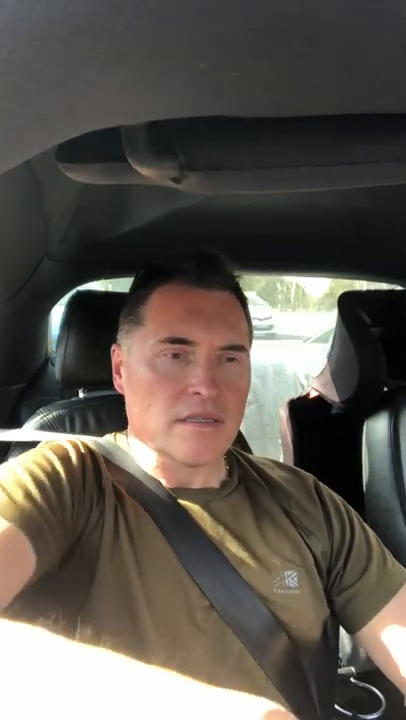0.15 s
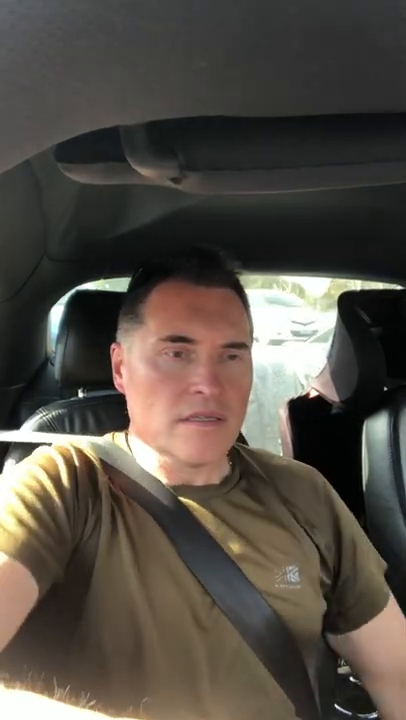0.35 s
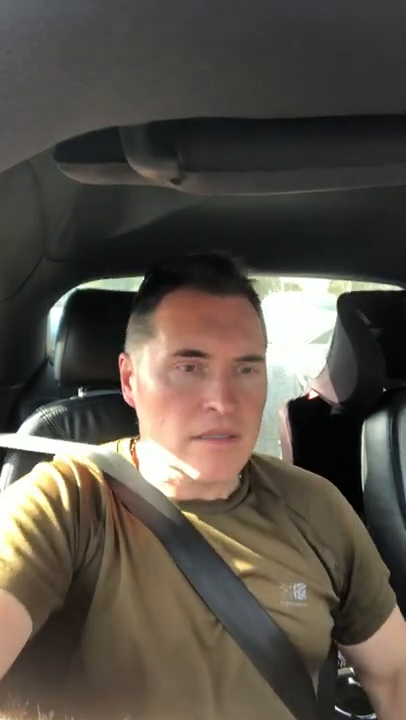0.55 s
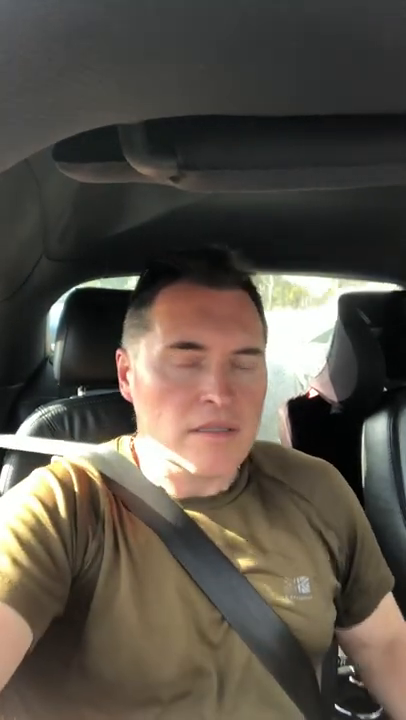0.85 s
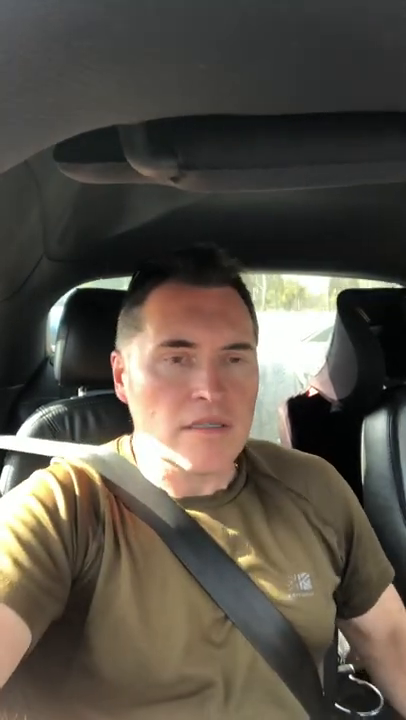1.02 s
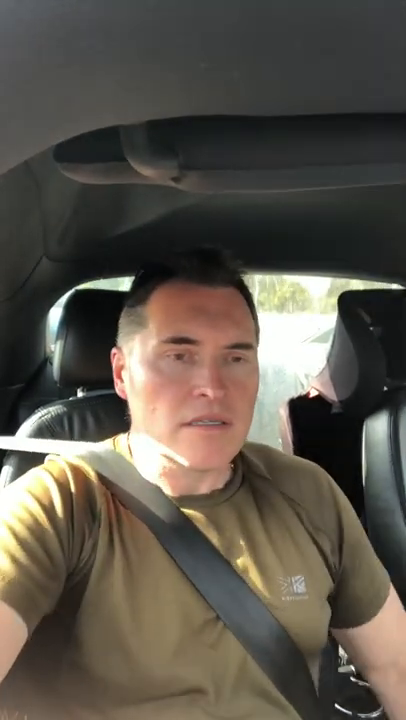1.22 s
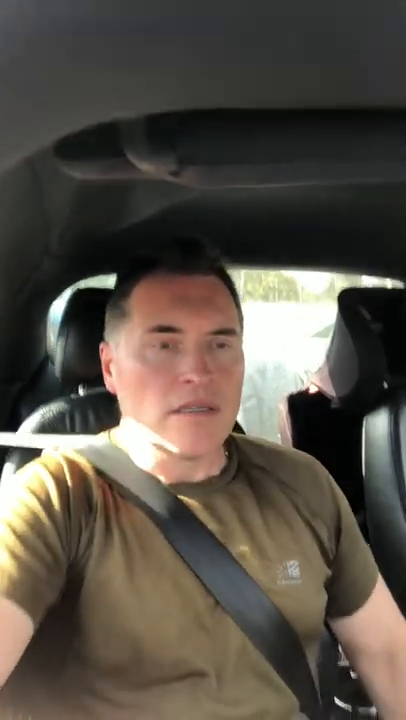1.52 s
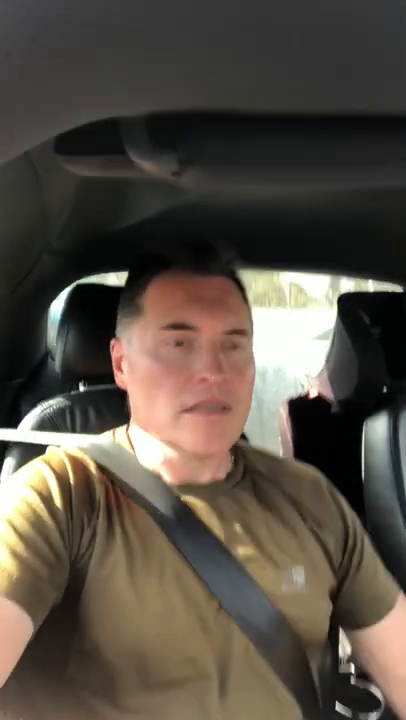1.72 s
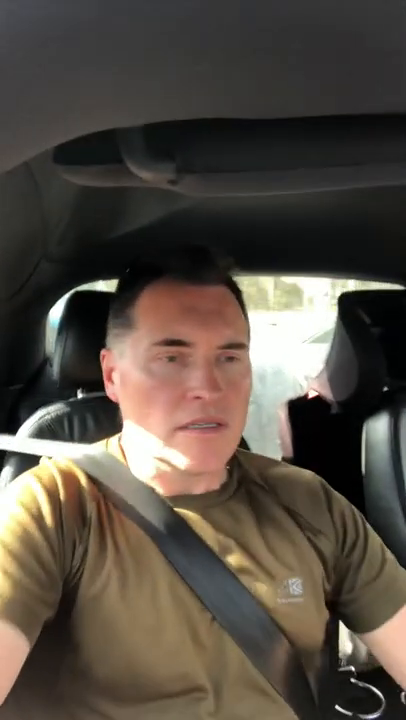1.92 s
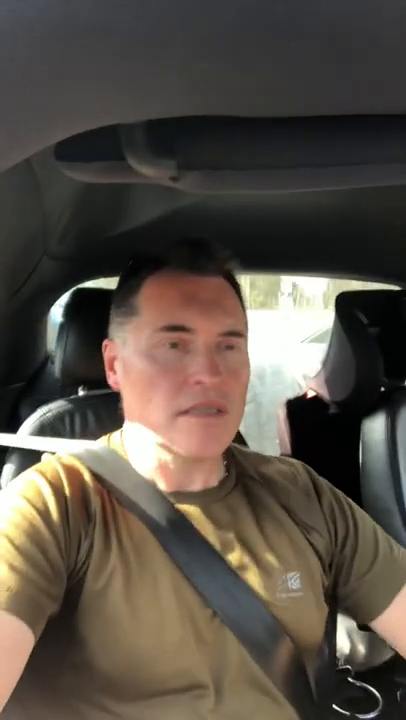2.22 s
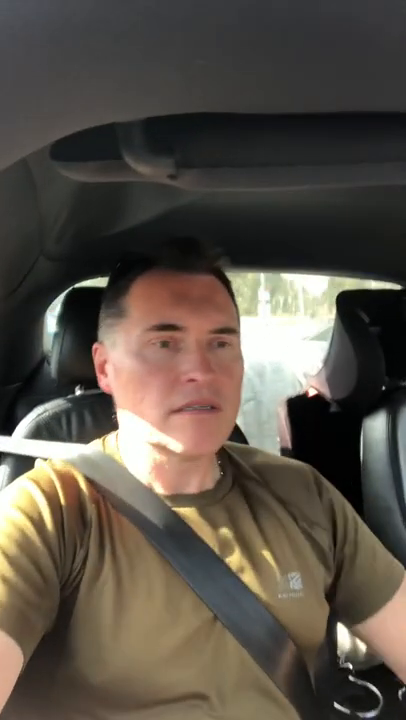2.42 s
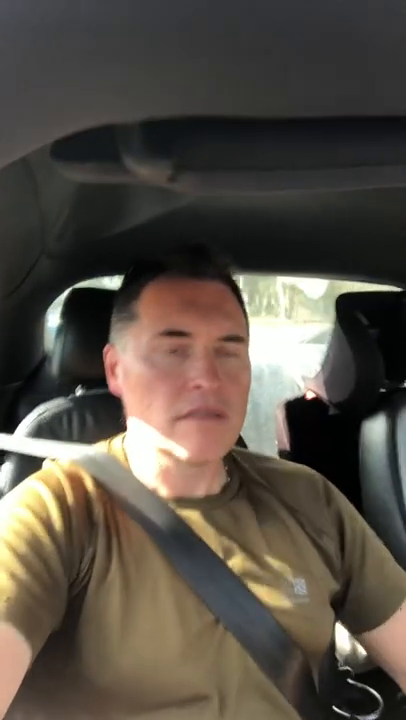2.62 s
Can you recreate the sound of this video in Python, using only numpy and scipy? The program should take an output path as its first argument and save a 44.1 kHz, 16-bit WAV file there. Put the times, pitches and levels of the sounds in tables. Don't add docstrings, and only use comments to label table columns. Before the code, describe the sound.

Inside a moving car, muffled engine drone dips low, then rises and settles; a hard hollow plastic knock comes early in the pull, later soft road thuds and a faint thin squeak, captured by a phone.

```python
import sys
import numpy as np
from scipy import signal
from scipy.io import wavfile
from scipy.ndimage import uniform_filter1d

SR = 44100
rng = np.random.default_rng(int(sys.argv[2]) if len(sys.argv) > 2 else 0)


def invert_db(x):
    u = np.asarray(x, float) / 20
    return 10 ** u


def unload_audio(sound):
    columns = np.transpose(np.atleast_2d(sound))
    steps = np.round(np.clip(columns, -1, 1) * 32767)
    wavfile.write(sys.argv[1], SR, steps.astype(np.int16))


N = 121275


def evened(x):
    return x / np.sqrt(np.mean(x ** 2) + 1e-20)


def peaked(x):
    return x / np.abs(x).max()


def drift(size):
    return evened(uniform_filter1d(uniform_filter1d(rng.standard_normal(N), size), size))


def read(points, hz):
    f, value = np.transpose(points)
    return np.interp(np.log(hz + 1), np.log(f + 1), value)


def causal(x, db_of, size):
    db = np.maximum(db_of(np.abs(np.fft.fftfreq(size, 1 / SR))), -100)
    log_gain = db * np.log(10) / 20
    taps = np.fft.ifft(np.exp(log_gain - 1j * signal.hilbert(log_gain).imag)).real[:size // 2]
    return signal.oaconvolve(x, taps)[:len(x)]


def resonate(x, hz, width):
    turn = np.exp(2j * np.pi * hz * np.arange(len(x)) / SR)
    r = np.exp(-np.pi * width / SR)
    return 2 * (turn * signal.lfilter([1 - r], [1, -r], x / turn)).real


def narrow_noise(hz, width):
    air = rng.standard_normal(N)
    return evened(resonate(resonate(air, hz, width), hz, width))


def noise(spectrum, patch_db, size):
    flicker_db = 0.27
    hz = np.fft.rfftfreq(size, 1 / SR)
    frames = N // (size // 4) + 5
    a, b, patches = rng.standard_normal((frames, len(hz), 3)).T
    patches = evened(uniform_filter1d(uniform_filter1d(patches, 10, 0), 10, 1))
    flicker = evened(uniform_filter1d(rng.standard_normal(frames), size=3))
    level_db = read(spectrum, hz)[:, None] + patch_db * patches + flicker_db * flicker
    z = (a + 1j * b) * invert_db(level_db)
    return evened(signal.istft(z, nperseg=size, noverlap=size * 3 // 4)[1][:N])


def ring(x, modes, shift):
    t = np.arange(SR // 8) / SR
    bell = sum(invert_db(db - 60 * t / t60) * np.sin(2 * np.pi * hz * shift * t) for hz, db, t60 in modes)
    return signal.fftconvolve(x, bell)[:len(x)]


# start in seconds, firing rate in Hz, load in dB,
# pulse sharpness in dB per doubling of order, road and air level in dB.
DRIVE = [(0.0, 73.73, -19, -5.5, -45.5), (0.101, 64.55, -16, -3.5, -47.5), (0.36, 45.31, -15, -4.5, -44.5),
         (0.488, 41.16, -14.5, -4.5, -44.5), (0.611, 51.03, -18, -4.5, -47.5),
         (0.67, 53.76, -12, -5, -46.5), (0.861, 55.94, -14.5, -6, -46), (1.192, 84.5, -18, -1, -42.5),
         (1.289, 92.5, -15, -1.5, -44.5), (1.368, 96.6, -11.5, -3.5, -42.5), (1.502, 97.83, -10, -5, -41),
         (1.7, 93.63, -5, -4, -41), (1.848, 106.5, -12.5, -0.5, -43.5), (2.012, 115.7, -9, -2, -41.5),
         (2.212, 124.5, -8.5, 1.5, -41), (2.338, 120.6, -11.5, -4.5, -38),
         (2.469, 119.6, -16.5, 0.5, -42.5), (2.75, 110.8, -18, -3.5, -45)]


def control(index):
    table = np.array(DRIVE)
    line = np.interp(np.arange(N) / SR, table[:, 0], table[:, index])
    return uniform_filter1d(line, size=1500, mode="nearest")


def air_level():
    level = control(index=4)
    return level - level.mean()


def turns():
    wobble = 0.0035
    return np.cumsum(control(index=1) * (1 + wobble * drift(size=500))) / SR


# centre in Hz, width in Hz, peak or notch in dB.
BOOM = [(65, 9.6, 3.5), (74.1, 7.9, -11.5), (102.6, 9.3, -2.5), (121.5, 20, 7), (156.7, 8.2, -6),
        (165.5, 30, 10), (182.9, 2.7, -21), (185, 4.7, 6), (208.1, 12.6, -6), (225, 12, -4),
        (241.6, 26, -8), (275.7, 28, 6), (325.4, 55, -8), (422, 53, 9.5), (518, 40, -2), (612, 23, 7),
        (728, 32, 6.5), (840, 110, 14)]
# frequency in Hz, level in dB.
MUFFLE = [(25, -8), (50, -0.5), (200, 1.5), (300, -10), (600, -25), (1200, -54), (3000, -72.5)]
# time in seconds, level of the second firing order in dB,
# level of the higher odd firing orders in dB.
CANCEL = [(0, 3, 1.5), (.18, -0.5, -1.5), (0.251, -3, -2), (.35, 2.5, -3.5), (.56, 4.5, 0),
          (0.651, -12, -0.5), (.78, -2, -0.5), (.92, 1.5, 1), (1.78, -0.5, 2), (1.85, -6.5, -6.5),
          (1.96, -9, 4), (2.049, -3.5, -7), (2.3, -0.5, -10.5), (2.501, -8.5, -6.5), (2.75, -9, 1)]


def engine(phase):
    half_db, quarter_db, uneven_db = -22.5, -35.5, 1.0
    sharpness = control(index=3)
    s, second, odd = np.transpose(CANCEL)
    second_db = np.interp(np.arange(N) / SR, s, second)
    odd_db = np.interp(np.arange(N) / SR, s, odd)
    out = np.zeros(N)
    for q in range(1, 49):
        order = q / 4
        firing = q % 4 == 0
        if firing:
            order_db, start = 0, 0
        else:
            order_db = half_db if q % 2 == 0 else quarter_db
            start = rng.uniform(0, 2 * np.pi)
        if q == 8:
            order_db = order_db + second_db
        elif q % 8 == 4 and q > 4:
            order_db = order_db + odd_db
        spread_db = uneven_db * (1 if firing else 3) * drift(size=900)
        level = invert_db(order_db + sharpness * np.log2(max(order, 1)) + spread_db)
        out += level * np.cos(2 * np.pi * order * phase + start)

    def body(hz):
        peaks = sum(db / (1 + (2 * (hz - f) / width) ** 2) for f, width, db in BOOM)
        return read(MUFFLE, hz) + peaks

    return causal(out * invert_db(control(index=2) - 4.5), body, size=32768)


# frequency in Hz, level in dB per Hz.
RUMBLE = [(20, -31), (40, -4), (60, 5.5), (130, 5.5), (230, 6), (330, -24), (700, -110)]


def road_rumble():
    return noise(RUMBLE, patch_db=1.5, size=4096) * invert_db(-28 + 0.11 * air_level())


# frequency in Hz, level in dB per Hz.
AIR = [(140, -37), (235, -4.5), (310, -9.5), (576, -19.5), (1090, -28.5), (1600, -38), (3500, -47),
       (13000, -100)]


def air_hiss(phase):
    puff = 1 + 0.076 * np.cos(2 * np.pi * phase)
    return noise(AIR, patch_db=1.4, size=512) * puff * invert_db(-32 + air_level())


# time in seconds, rustle level in dB.
RUSTLE = [(0, -70), (.045, -71), (.06, -74), (.4, -74), (.6, -76), (.64, -80), (.9, -79.5), (.99, -77.5),
          (1.1, -76), (1.24, -77.5), (1.35, -71), (1.39, -72.5), (1.6, -68.5), (1.85, -71.5), (2.1, -71),
          (2.42, -69.5), (2.47, -76), (2.75, -77.5)]
# frequency in Hz, level in dB per Hz.
FIZZ = [(2500, -15.5), (4500, 2), (6500, 0.5), (8500, -7.5), (11000, -11.5), (15800, -16)]


def cloth_rustle():
    level_db = np.interp(np.arange(N) / SR, *np.transpose(RUSTLE))
    return noise(FIZZ, patch_db=0.6, size=256) * invert_db(10.5 + level_db)


# centre in Hz, width in Hz, level in dB.
WHISTLE = [
    (2442, 52, -71),
    (3293, 76, -67.5),
    (4990, 790, -67),
]


def vents():
    level = air_level()
    return sum(invert_db(db + level) * narrow_noise(hz, width) for hz, width, db in WHISTLE)


# frequency in Hz, level in dB per Hz.
CRACK = [(530, -37.5), (900, -0.5), (1120, -1.5), (1940, -17), (2180, -10.5), (3360, -8), (4980, -16.5),
         (15700, -29.5)]


def crackle():
    clicks_per_s, spread_db, t60 = 83, 3.5, 0.015
    draw = rng.random((N, 2))
    clicks = (draw[:, 0] < clicks_per_s / SR) * invert_db(-spread_db * np.log(draw[:, 1] + 0.01))
    t = np.arange(600) / SR
    grain = rng.standard_normal(600) * invert_db(-60 * t / t60)
    clicks = signal.oaconvolve(clicks, grain)[:N]
    return invert_db(-69) * causal(clicks, lambda hz: read(CRACK, hz) - 30 * (hz < 2000), size=2048)


def snap(peak_db, hz):
    t60, width_octaves = 0.016, 0.42
    t = np.arange(1500) / SR
    burst = rng.standard_normal(len(t)) * invert_db(-60 * t / t60)
    top_db = -26 + 14 * np.log2(min(hz / 6000, 1))

    def colour(f):
        hump = -12 * (np.log2((f + 50) / hz) / width_octaves) ** 2
        return np.maximum(hump, np.where(f > hz, top_db, -99))

    return invert_db(peak_db) * peaked(causal(burst, colour, size=1024))


def place(rows, voice):
    out = np.zeros(N + SR)
    for s, *settings in rows:
        sound = voice(*settings)
        out[round(s * SR):][:len(sound)] += sound
    return out[:N]


# start in seconds, peak in dB, centre pitch in Hz.
SNAPS = [(.221, -57, 11000), (.222, -59, 7470), (.268, -60, 13700), (.304, -56.5, 11800),
         (.328, -53.5, 12200), (.341, -62.5, 11000), (.398, -49.5, 10000), (.245, -54.5, 5540),
         (.273, -46.5, 6300), (.276, -41.5, 3580), (.28, -48.5, 4030), (.304, -47, 5880),
         (.328, -49.5, 6820), (.358, -47, 8060), (.427, -60, 13650), (.427, -56.5, 5000),
         (.51, -51.5, 6480), (.507, -41, 2920), (.787, -55, 12270), (.919, -43, 3332), (.944, -29, 3200),
         (1.018, -54, 7160), (1.033, -61, 6987), (1.048, -49.5, 6830), (1.063, -44, 5590),
         (1.071, -39, 5400), (1.071, -51, 9030), (1.071, -56, 15100), (1.099, -42, 6040),
         (.929, -20.5, 4260), (1.129, -27.5, 3820), (1.18, -34.5, 3650), (1.187, -42.5, 13870),
         (1.13, -35.5, 1296), (1.14, -33, 1710), (1.181, -33.5, 1230), (1.189, -33, 1970),
         (1.3, -51.5, 7083), (1.402, -36.5, 604), (1.524, -41, 573), (1.567, -37.5, 640),
         (1.608, -33.5, 620), (1.875, -39.5, 668), (1.986, -37.5, 597), (1.532, -36.5, 1456),
         (1.64, -42, 3048), (1.712, -36, 3492), (1.997, -39.5, 4350), (2.004, -38.5, 3580),
         (2.016, -42.5, 3533), (2.08, -43, 3011), (2.085, -50.5, 4700), (2.255, -42, 3400),
         (2.36, -50.5, 6500), (.935, -26.5, 904), (.946, -32.5, 1110), (1.196, -35.5, 1210),
         (1.2, -41, 3210), (1.145, -42.5, 2500)]


def snaps():
    return place(SNAPS, snap)


# pitch in Hz, level in dB, 60 dB decay in seconds.
TRIM = [(2449, -3, 0.035), (3020, -10, 0.06), (3414, -6.5, .04), (4000, -8, 0.03), (3750, -4, 0.04),
        (4280, -3, 0.015), (6400, -14, .02), (7200, -16, .02)]
# pitch in Hz, level in dB, 60 dB decay in seconds.
HOLLOW = [(630, -1, 0.055), (1048, -8.5, 0.09), (1830, -14, .04)]
# pitch in Hz, level in dB, 60 dB decay in seconds.
DEEP = (300.5, -6, .06)


def knock(peak_db, pitch, hollow_db, thin):
    contacts_per_s, chatter_s, tail_t60, top_t60 = 4500, 0.0041, 0.068, 0.14
    t = np.arange(SR // 6) / SR
    draw = rng.random((len(t), 3))
    rise = np.minimum(t / 0.001, 1) * np.minimum(0.4 + 0.6 * t / 0.0043, 1)
    shape = rise * invert_db(-60 * np.maximum(t - chatter_s, 0) / tail_t60)
    chatter = shape * (draw[:, 0] < contacts_per_s / SR) * (2 * draw[:, 1] - 1) ** 3
    spray = shape * (2 * draw[:, 2] - 1) * 0.17 + chatter
    dull = 2.2 * (peak_db + 15) * (1 - thin) ** 2

    def colour(hz):
        tilt = 14 * thin * np.log2((hz + 50) / 5000) * (hz < 5000)
        top = dull * np.log2(np.maximum(hz / 8000, 1))
        return read(CRACK, hz) + tilt - 40 * (hz < 800) + top

    crack = causal(spray * invert_db(-60 * t / top_t60), colour, size=2048)
    crack = crack + 0.21 * causal(spray, lambda hz: colour(hz) - hz / 600, size=2048)
    rung = ring(chatter, TRIM, 1 + 0.02 * (draw[0, 1] - 0.5))
    bright = peaked(peaked(crack) + invert_db(-9.5 - 2.3 * thin) * peaked(rung))

    deep_hz, deep_db, deep_t60 = DEEP
    deep_db = deep_db + 0.4 * (peak_db + hollow_db + 21)
    push = np.sin(np.pi * np.minimum(t / 0.00095, 1))
    body = peaked(ring(push, HOLLOW + [(deep_hz, deep_db, deep_t60)], pitch))
    return invert_db(peak_db) * bright + invert_db(hollow_db) * body * np.minimum(t / 0.0022, 1)


# start in seconds, peak in dB, hollow pitch factor,
# hollow body level in dB, thinness from 0 to 1.
KNOCKS = [
    (.37, -35, 1.8, -46, 0.4),
    (.3765, -40.5, 1.23, -22.5, 0.6),
    (.41, -44.5, 1.05, -17.5, 0),
    (.9262, -14, 1.04, -6.5, 0.06),
    (.956, -39.5, 0.89, -54, 0.6),
    (1.1263, -25.5, 0.84, -52, .05),
    (1.178, -22.5, 1.05, -14.5, .05),
    (1.192, -37.5, 1.0, -60, .9),
    (1.205, -43, 0.87, -56, 0.8),
    (1.4376, -33, 1.1, -50, 1),
]


def knocks():
    return place(KNOCKS, knock)


# centre in seconds, level in dB, pitch in Hz.
BUMPS = [
    (1.182, -24, 64.38),
    (1.869, -22, 54.8),
    (2.099, -35, 58),
    (2.194, -27, 58.37),
    (2.372, -36.5, 59.6),
    (2.594, -21.5, 57),
]


def road_bumps():
    out = np.zeros(N)
    for s, db, hz in BUMPS:
        late = np.arange(N) / SR - s
        out += invert_db(db) * np.exp(-0.5 * (late / 0.028) ** 2) * np.sin(2 * np.pi * hz * late)
    return out


# centre in Hz, width in Hz, level in dB.
SQUEAK_LOW = [
    (2720, 60, -6),
    (2471, 70, -5),
]


def squeak():
    squeak_hz, from_s = 3451, 2.235
    late = np.arange(N) / SR - from_s
    since = np.maximum(late, 0)
    lift_db = 14.5 * np.clip(late * 20, 0, 1) - 20 * since
    line = np.sqrt(2) * np.sin(2 * np.pi * np.cumsum(squeak_hz + 14 * drift(size=300)) / SR)
    fuzz = invert_db(-2) * narrow_noise(squeak_hz, 95)
    under = sum(invert_db(db) * narrow_noise(hz, width) for hz, width, db in SQUEAK_LOW) * invert_db(-15 * since)
    return (line + fuzz + under) * invert_db(-70.5 + lift_db + 1.2 * drift(size=400))


def scene():
    phase = turns()
    drive = engine(phase) + road_rumble() + road_bumps()
    air = air_hiss(phase) + cloth_rustle() + vents()
    loose = crackle() + snaps() + knocks() + squeak()
    return (drive + air + loose)[None]


def low_pass(x):
    return signal.sosfilt(signal.butter(12, 15850, fs=SR, output="sos"), x)


def record(dry):
    fade = np.minimum(np.arange(N) / SR / 0.0047, 1)
    mix = 0.99 * np.tanh(dry * fade / 0.87)
    return low_pass(mix)


dry = scene()
out = record(dry)
unload_audio(out)
```